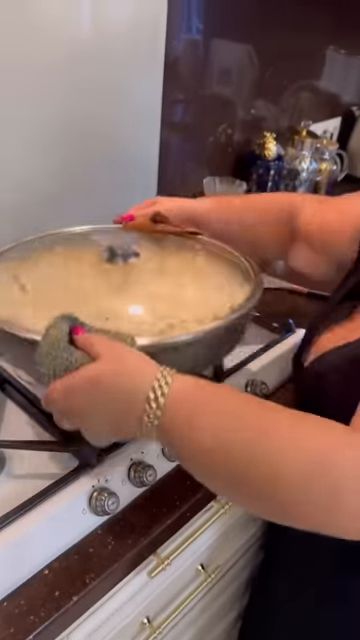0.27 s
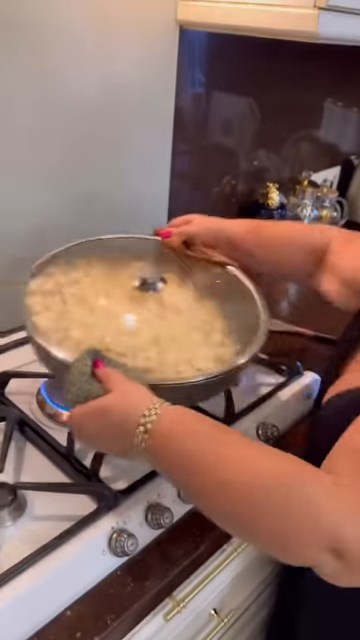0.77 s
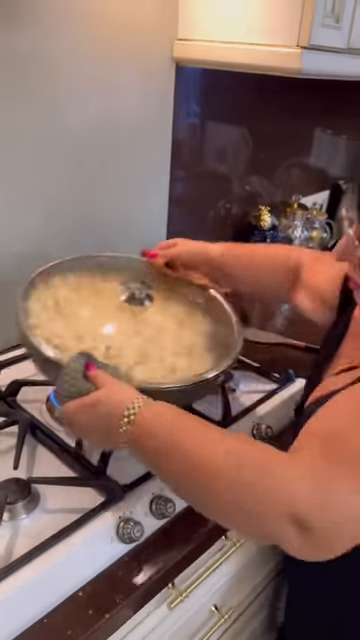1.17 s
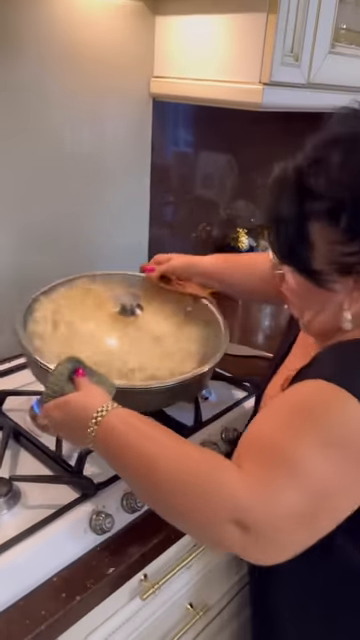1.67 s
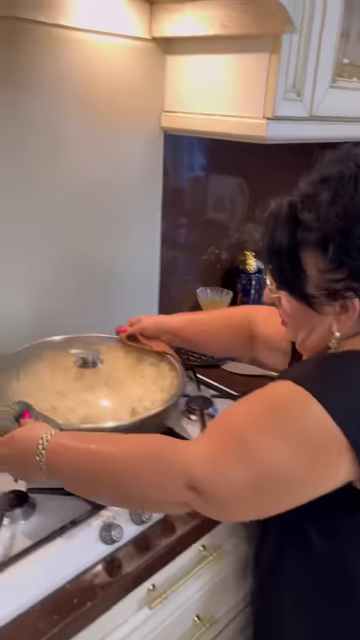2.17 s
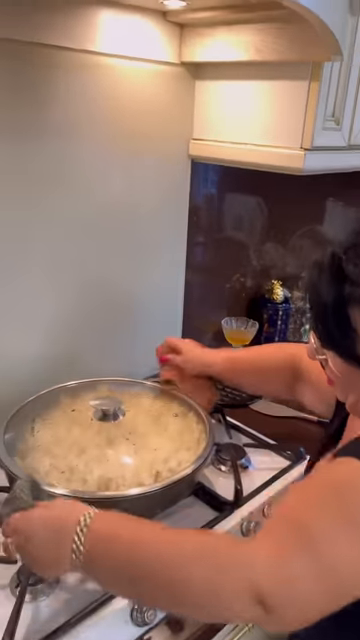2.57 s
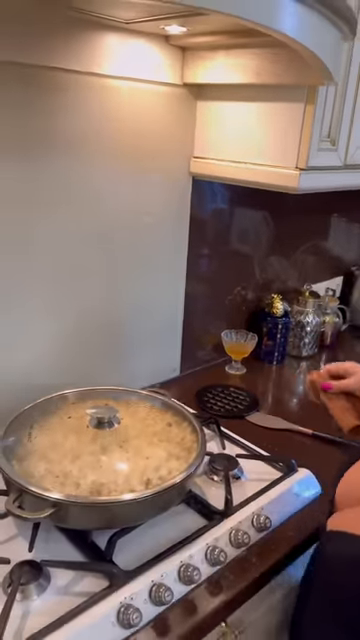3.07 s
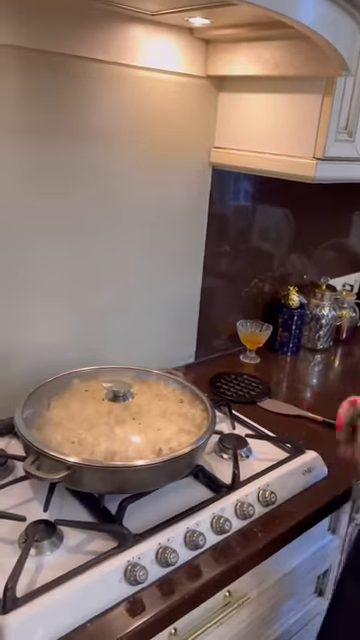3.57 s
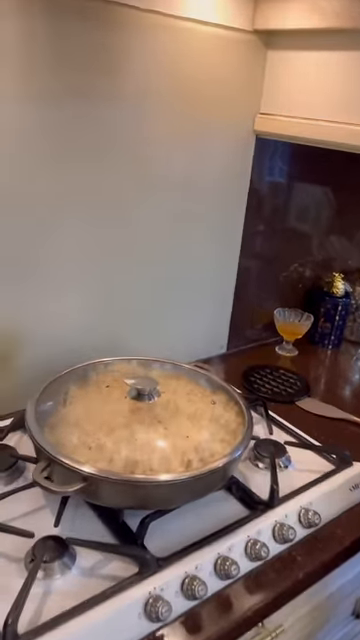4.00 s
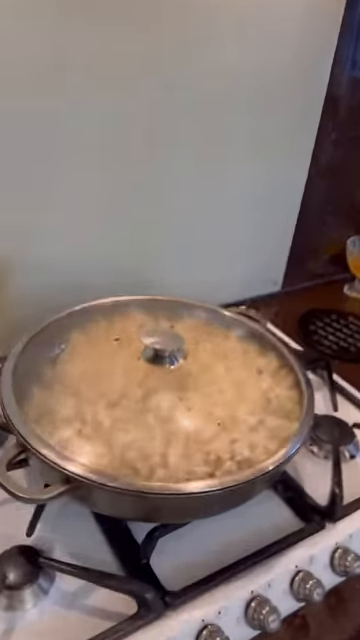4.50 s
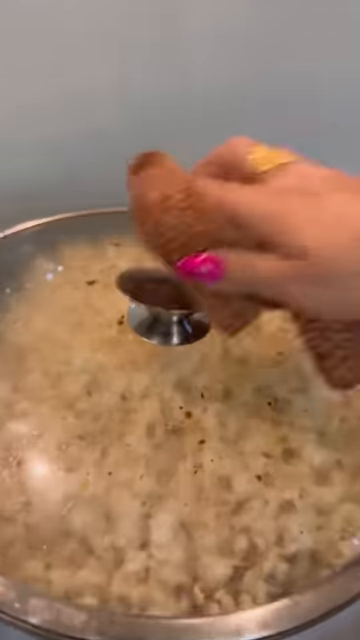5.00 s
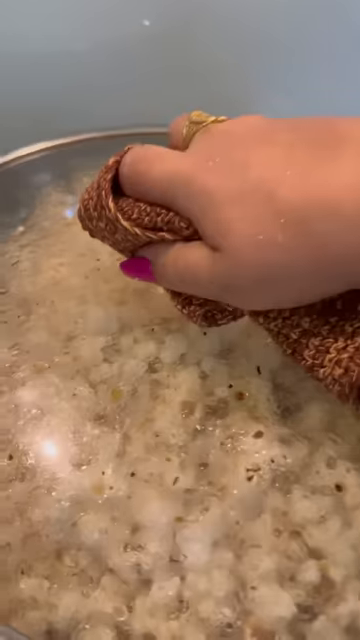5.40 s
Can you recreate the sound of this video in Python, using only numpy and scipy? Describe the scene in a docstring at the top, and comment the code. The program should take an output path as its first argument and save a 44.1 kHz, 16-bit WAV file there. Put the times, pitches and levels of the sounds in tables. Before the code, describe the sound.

In a small home kitchen, kernels snap and thump inside a lidded pan over a low gas flame. Popcorn swishes as the pan is swirled, then metal scrapes along the grate and lands with a bump and a loud ringing knock. Popping thickens, the glass lid clinks, and steam hisses up at the end with dull knocks. Close stereo microphone, short room echo.

```python
"""Popcorn pops in a wide pan with a glass lid on a gas hob: hull crack, low puff of steam, kernel tap.
The lid clinks and rings; pan and lid give short dull knocks; the popcorn swishes as the pan is swirled.
The pan rubs and hums on the grate, is dragged aside and set down with a bump and a loud knock.
Steam and hot oil hiss under the lid, made of random tiny clicks; the burner is low, even noise.
A stereo microphone hears it in a small kitchen, with the pops 11 dB above their echo."""
import sys
import numpy as np
from scipy import signal
from scipy.fft import rfft, irfft, next_fast_len
from scipy.io import wavfile

SR = 44100
rng = np.random.default_rng(int(sys.argv[2]) if len(sys.argv) > 2 else 0)


def generate_wav(sig):
    """Save sig (samples, or channels by samples) to the path in sys.argv[1] as 16-bit PCM at SR."""
    pcm = np.round(np.clip(np.atleast_2d(sig).T, -1, 1) * 32767).astype(np.int16)
    wavfile.write(sys.argv[1], SR, pcm)


N = 249045
TIME = np.arange(N) / SR   # s
PADDED = 2 * next_fast_len(N // 2 + SR // 4)   # room for tails when filtering
FREQS = np.maximum(np.arange(PADDED // 2 + 1) * SR / PADDED, 1)   # Hz

# Levels in event tables are relative; the function below each table adds its own gain.
# Colour tables give the shape of a spectrum, as power per Hz.

# the pops, muffled when deep in the heap: start_s [s], crack_db [dB], puff_db [dB]
POP_EVENTS = [(0.1184, -70, -38), (0.1433, -20, -39), (0.209, -30, -34), (0.305, -43, -43),
              (0.363, -46, -37), (0.527, -25.5, -43.5), (0.696, -60, -34.5), (0.753, -31, -35),
              (1.4113, -24.5, -37), (1.716, -28.5, -37.5), (1.86, -39, -42), (2.1742, -23.5, -43),
              (2.582, -31.5, -34), (2.7492, -23.5, -32.5), (2.933, -22.5, -51), (3.1622, -28, -35),
              (3.277, -32, -41), (3.309, -29.5, -46), (3.4712, -39.5, -39.5), (3.5716, -28.5, -41),
              (3.6015, -21.5, -37.5), (3.6492, -28, -43), (3.7339, -37.5, -36.5), (3.913, -26.5, -36.5),
              (3.989, -22, -38), (4.1864, -28, -39), (4.277, -31.5, -39), (4.596, -21, -29.5),
              (4.6485, -22.5, -29.5), (4.724, -20, -31.5), (4.801, -26, -33), (4.832, -40, -32.5),
              (4.8796, -36, -33), (5.1415, -19, -36), (5.1603, -23.5, -30), (5.3333, -16.5, -34),
              (5.4595, -21.5, -26.5), (5.5006, -26.5, -28.5)]
# colour of the hull crack: pitch_hz [Hz], level_db [dB per Hz]
CRACK_COLOUR = [(1000, -22), (3000, -10), (5500, -1), (8500, 0), (11000, -4), (15500, -5)]
# a popping kernel is thrown against the pan: usual throw [dB], dB gained per dB of crack and of puff
THROW_DB, THROW_PER_CRACK, THROW_PER_PUFF = -35, 0.48, 0.09
BOOM_PER_DB = 1.5   # a stronger puff shakes the pan more: dB of extra boom per dB
# the puffs get higher as the pan fills
PUFF_HZ, PUFF_RISE_HZ_PER_S = 116.8, 3.77


def popcorn(crack_gain_db=16, tap_gain_db=21, ring_gain_db=12, puff_gain_db=5, contact_delay_s=0.0006):
    """Steam puff, hull crack and kernel tap with lid ring; a stronger pop throws the kernel harder."""
    cracks, taps, body = np.zeros((2, N)), np.zeros((2, N)), np.zeros(N)
    _, usual_crack_db, usual_puff_db = np.mean(POP_EVENTS, axis=0)
    for start_s, crack_db, puff_db in POP_EVENTS:
        contact_s = start_s + contact_delay_s
        extra_puff_db = puff_db - usual_puff_db
        throw_db = THROW_DB + THROW_PER_CRACK * (crack_db - usual_crack_db)
        throw_db = throw_db + THROW_PER_PUFF * extra_puff_db
        puff_hz = PUFF_HZ + PUFF_RISE_HZ_PER_S * start_s
        steam_puff = puff(puff_hz, BOOM_PER_DB * extra_puff_db)
        add(cracks, contact_s, from_db(crack_db + crack_gain_db) * burst(t60=0.059, spike=0.67))
        add(taps, contact_s, from_db(tap_gain_db) * tap(throw_db))
        add(body, contact_s, from_db(throw_db + ring_gain_db) * lid_ring())
        add(body, start_s, from_db(puff_db + puff_gain_db) * steam_puff)
    sharp = colour(cracks, CRACK_COLOUR) + under_lid(colour(taps, TAP_COLOUR))
    return spread(sharp) + body


def burst(t60, spike):
    """A sharp snap, in the first channel, and its scatter inside the pan; energy 1."""
    t = TIME[:SR // 8]
    scatter = energy_one(rng.standard_normal((2, SR // 8)) * dying(t, t60))
    scatter[0, 0] += spike
    return energy_one(scatter)


PUFF_T60 = .13   # s, ring and boom after the thump


def puff(hz, shake_db=0, swell_cycles=0.9, glide=3.15, glide_s=0.0025,
         ring_db=-22, boom_hz=86, boom_db=-14.0):
    """A short thump sinks in pitch towards hz; a faint ring and a soft boom of the pan follow."""
    t = TIME[:SR // 6]
    age = t * hz / swell_cycles   # 1 at the fullest
    thump = (age * np.exp(1 - age)) ** 3
    pitch = hz * (1 + glide * np.exp(-t / glide_s))
    wave = np.sin(2 * np.pi * np.cumsum(pitch) / SR)
    boom = from_db(boom_db + shake_db) * np.sin(2 * np.pi * boom_hz * t)
    after = from_db(ring_db) * wave + boom
    return thump * wave + np.minimum(age, 1) * dying(t, PUFF_T60) * after


# colour of a kernel tap: pitch_hz [Hz], level_db [dB per Hz]
TAP_COLOUR = [(200, -5.5), (700, 7), (1100, 1), (1900, 5.5), (3000, 3.5), (7000, 0.5), (14000, -2)]


def tap(db, contact_hz=3000, usual_db=-35):
    """A kernel strikes pan or lid; a harder tap is a shorter contact, so it is brighter and sharper."""
    hardness = from_db(db - usual_db)
    dull = np.exp(-2 * np.pi * contact_hz * hardness / SR)   # one-pole lowpass
    strike = burst(t60=.042, spike=.25 + .22 * hardness)
    return from_db(db) * signal.lfilter([1 - dull], [1, -dull], strike)


# ring of the lid and the air under it, clusters of close modes: pitch_hz [Hz], level_db [dB], t60_s [s]
LID_MODES = [(800, -2.5, 0.08), (1320, 0, 0.1), (1570, -3, 0.11), (1770, -2, 0.06), (2230, 0, 0.05),
             (2720, 1.5, 0.06), (3500, -4, 0.08), (4230, -8, 0.09)]


def lid_ring(strongest_hz=None, focus_db=19):
    """The lid rings; where it is struck decides which cluster answers most."""
    modes = []
    for hz, db, t60 in LID_MODES:
        octaves_away = abs(np.log2(hz / (strongest_hz or hz)))
        modes.append((hz, db - focus_db * np.sqrt(octaves_away), t60))
    return ringing(modes, uneven_db=3, split_hz=28, count=4)


def under_lid(x, width_hz=130, lift=0.73):
    """Sound from inside the pan is lifted around each resonance of the lid."""
    peaks = 0
    for hz, db, _ in LID_MODES:
        peaks = peaks + from_db(db) * signal.lfilter(*signal.iirpeak(hz, hz / width_hz, fs=SR), x + 1e-18)
    return x + lift * peaks


def ringing(modes, uneven_db, split_hz=0, count=1):
    """Struck modes, each a cluster of close partials; every blow stirs them differently; energy 1."""
    t, out = TIME[:round(SR * max(m[2] for m in modes))], 0
    for hz, db, t60 in modes:
        for luck, sign, offset in rng.standard_normal((count, 3)):
            strength = np.sign(sign) * from_db(db + uneven_db * luck)
            partial = np.sin(2 * np.pi * (hz + split_hz * offset) * t)
            out = out + strength * partial * dying(t, t60)
    return energy_one(out)


def buried_pops(level_db=-45, tick_db=-26, middle_hz=125, count=60):
    """Kernels deep in the heap give only a soft thud and a faint tick, at uneven intervals."""
    thuds, ticks = np.zeros(N), np.zeros(N)
    times = (np.arange(count) + rng.random(count)) * N / SR / count
    for start_s, (size, pitch) in zip(times, rng.standard_normal((count, 2))):
        strength = from_db(4 * min(size, 1))
        add(thuds, start_s, from_db(level_db) * strength * puff(middle_hz * np.exp(.25 * pitch)))
        add(ticks, start_s, from_db(tick_db) * strength * burst(t60=.04, spike=.2)[0])
    return thuds + colour(ticks, TAP_COLOUR)


# the lid, struck by a kernel or chattering on the rim:
# start_s [s], tap_db [dB], ring_db [dB], strongest_hz [Hz]
LID_CLINKS = [(0.129, -35, -42.5, 1320), (3.915, -57, -47, 1570), (4.187, -48, -45.5, 1570),
              (4.191, -54, -48, 4230), (4.223, -46, -57, 1320), (4.406, -36, -50, 1770),
              (4.438, -39, -53, 2720), (4.515, -41, -52, 2720), (4.594, -41, -43, 1770),
              (4.614, -33, -43.5, 1320), (4.659, -31, -42, 1770), (4.6691, -19.5, -31, 2720),
              (4.671, -45, -36.5, 1320), (4.726, -43, -38.5, 800), (4.802, -33, -49, 1770),
              (4.922, -43.5, -49.5, 1320), (5.163, -36, -40, 800), (5.338, -24.5, -35.5, 800),
              (5.479, -39, -38.5, 1320), (5.505, -35, -37, 800), (5.525, -35.5, -39.5, 1320),
              (5.614, -36, -36.5, 1770)]


def clinks(tap_gain_db=23.0, ring_gain_db=27):
    """A hard tap on the glass and the short ring that follows it."""
    taps, rings = np.zeros((2, N)), np.zeros(N)
    for start_s, tap_db, ring_db, strongest_hz in LID_CLINKS:
        add(taps, start_s, from_db(tap_gain_db) * tap(tap_db))
        add(rings, start_s, from_db(ring_db + ring_gain_db) * lid_ring(strongest_hz))
    return spread(under_lid(colour(taps, TAP_COLOUR))) + rings


# dull knocks: start_s [s], level_db [dB], pitch_hz [Hz]
DULL_KNOCKS = [(5.159, -29, 427), (5.5248, -20, 276), (5.585, -26.5, 327), (5.62, -33, 262)]


def dull_knocks():
    """Short dull knocks of pan and lid: a full thud under one pop, then the lid on its rim."""
    out = np.zeros(N)
    for start_s, level_db, pitch_hz in DULL_KNOCKS:
        add(out, start_s, from_db(level_db) * puff(pitch_hz, swell_cycles=1.35, glide=0.32))
    return out


# the pan bumps on the grate, lands and settles: start_s [s], clatter_db [dB], ring_db [dB], rattle_s [s],
# low_hz [Hz], full_hz [Hz], fullness [gain of the resonance at full_hz], high_hz [Hz]
PAN_KNOCKS = [(1.986, -25, -29.5, 0.079, 213, 270, 1.5, 4330),
              (2.216, -21.5, -18, 0.057, 55, 680, 0.93, 9400),
              (2.285, -28.5, -24.5, 0.058, 50, 80, 1.5, 194)]
# ring of grate and hob sheet: pitch_hz [Hz], level_db [dB], t60_s [s]
HOB_MODES = [(76, 1, 0.51), (137.3, 7, 0.45), (239, 4.5, 0.53), (365.5, -3.5, 0.5), (516, 0.5, 0.72),
             (589, 8.5, 0.48), (647, 1, 0.57), (724, 4, 0.5), (860, 4, 0.15), (995, 2.5, 0.3)]
# colour of the dense clatter: pitch_hz [Hz], level_db [dB per Hz]
CLATTER_COLOUR = [(40, 0), (100, -5.5), (270, 0), (500, -6.5), (800, -7), (1400, -10.5), (3000, -14),
                  (5000, -20), (7000, -14.5), (15000, -21)]
# how long the clatter lasts: pitch_hz [Hz], t60_s [s]
CLATTER_DECAY = [(100, 0.62), (500, 0.71), (950, 0.53), (2000, 0.49), (9000, 0.37)]


def knocks(clatter_gain_db=32, ring_gain_db=33, contacts_per_s=2500, rise_s=0.0068, tail_db=2.0):
    """The heavy pan chatters on the grate as it lands; the hob sheet rings and a dense clatter dies away."""
    clatter, rings = np.zeros((2, N)), np.zeros(N)
    for start_s, clatter_db, ring_db, rattle_s, low_hz, full_hz, fullness, high_hz in PAN_KNOCKS:
        tail = diffuse_tail(CLATTER_DECAY)
        contacts = (rng.random(N) < contacts_per_s / SR) * rng.standard_normal(N)
        chatter = energy_one(contacts * np.exp(-(TIME / rattle_s) ** 2))
        blow = (chatter + from_db(tail_db) * tail) * (1 - np.exp(-TIME / rise_s))
        # where the pan lands decides which broad resonance of the grate answers most
        blow = blow + fullness * signal.lfilter(*signal.iirpeak(full_hz, 2, fs=SR), blow + 1e-18)
        softness = signal.butter(2, [low_hz, min(high_hz, .45 * SR)], "band", fs=SR, output="sos")
        add(clatter, start_s, from_db(clatter_db + clatter_gain_db) * signal.sosfilt(softness, blow))
        ring = signal.sosfilt(softness, ringing(HOB_MODES, uneven_db=2.0, split_hz=4.04, count=2))
        add(rings, start_s + rise_s, from_db(ring_db + ring_gain_db) * ring)
    return colour(clatter, CLATTER_COLOUR) + rings


# the pan is dragged over the grate: a first bite dies away into a lighter glide
DRAG_START_S, DRAG_FADE_S = 1.46, 0.059
DRAG_BITE_DB, DRAG_BITE_T60, DRAG_GLIDE_DB = -31.5, 0.94, -47.5
# colour of the rubbing: pitch_hz [Hz], level_db [dB per Hz]
RUB_COLOUR = [(80, -14), (170, -8.5), (260, 1), (340, -5.5), (480, -12.5), (800, -18.5), (4000, -26.5)]


def slide():
    """The pan bottom bites on the iron grate, then rubs more lightly until it has been set down."""
    since = np.maximum(TIME - DRAG_START_S, 0)
    end_s = PAN_KNOCKS[-1][0] + DRAG_FADE_S
    pressure = from_db(DRAG_GLIDE_DB) + from_db(DRAG_BITE_DB) * dying(since, DRAG_BITE_T60)
    contact = np.clip(np.minimum(since, end_s - TIME) / DRAG_FADE_S, 0, 1)
    return pressure * contact * spread(colour(grains(per_s=1100, uneven_db=-1.0), RUB_COLOUR))


def grains(per_s, uneven_db):
    """Two trains of random tiny clicks of uneven size; rms 1."""
    sizes = from_db(uneven_db * np.minimum(rng.exponential(1, (2, N)), 4))
    sizes = sizes * rng.choice([-1, 1], (2, N))
    return rms_one(sizes * (rng.random((2, N)) < per_s / SR))


# rubbing makes the pan hum: strongest_s [s], level_db [dB]
PAN_HUMS = [(1.1, -47), (5.62, -45.5)]
HUM_HZ, HUM_WIDTH_HZ, HUM_T60 = 374, 13, 0.42   # T60 in s, swell and ebb alike


def pan_hum():
    """Rubbing on the grate or the rim sets the pan humming for a moment: noise through a narrow peak."""
    rubbing = sum(from_db(db) * dying(np.abs(TIME - s), HUM_T60) for s, db in PAN_HUMS)
    resonance = signal.iirpeak(HUM_HZ, HUM_HZ / HUM_WIDTH_HZ, fs=SR)
    return rubbing * rms_one(signal.lfilter(*resonance, rng.standard_normal(N)))


# swirls of the pan: fastest_s [s], level_db [dB], t60_s [s, of swell and ebb]
PAN_SWIRLS = [(.32, -40.5, 1.7), (0.747, -32.5, 0.83), (1.16, -37.5, 0.99), (1.6, -38, 0.73)]
# colour of the swishing popcorn: pitch_hz [Hz], level_db [dB per Hz]
SWISH_COLOUR = [(500, -8), (2000, -4.5), (4200, -3), (6500, 0), (11000, -7), (15500, -8)]


def swish(flicker_db=0.3):
    """Light, dry popcorn tumbles along the wall of the pan, swelling and ebbing with each swirl."""
    speed = sum(from_db(db) * dying(np.abs(TIME - s), t60) for s, db, t60 in PAN_SWIRLS)
    brushing = colour(grains(per_s=2400, uneven_db=2.8), SWISH_COLOUR)
    return speed * from_db(flicker_db * drift(28.7)) * spread(under_lid(brushing, lift=0.45))


# vigour of the frying, as steam hiss: time_s [s], level_db [dB]
FRYING_VIGOUR = [(0.0, -48), (0.91, -41), (1.67, -38.5), (2.45, -53.5), (2.88, -49.5), (3.7, -56),
                 (4.51, -53.5), (5.43, -50), (5.65, -34.5)]
OIL_FOLLOWS = 0.57   # share of the steam's swing in dB that the oil follows
# colour of the steam: pitch_hz [Hz], level_db [dB per Hz]
STEAM_COLOUR = [(1500, -22), (4000, -8), (5400, 0), (8500, -.5), (10500, -4.5), (12000, -2.5), (15500, -2)]
# colour of the oil: pitch_hz [Hz], level_db [dB per Hz]
OIL_COLOUR = [(150, -9), (370, 10.5), (800, 9), (2100, 4.5), (3200, 3), (9000, -28.5)]


def frying(steam_gain_db=4.5, oil_db=-52, flicker_db=2.5, cavity_t60=0.22, cavity_db=-7):
    """Steam hisses at the rim, tiny droplets burst in the oil; the space under the lid rings with both."""
    hiss_db, = in_time(FRYING_VIGOUR)
    sizzle_db = OIL_FOLLOWS * (hiss_db - hiss_db.mean())
    steam_level = from_db(hiss_db + steam_gain_db + flicker_db * drift(25.177))
    steam = steam_level * colour(grains(per_s=25000, uneven_db=4.5), STEAM_COLOUR)
    oil_level = from_db(sizzle_db + oil_db + flicker_db * drift(26.34))
    oil = oil_level * colour(grains(per_s=9000, uneven_db=3.5), OIL_COLOUR)
    cavity = rfft(burst(cavity_t60, spike=0)[0], PADDED)
    return spread(filtered(steam + oil, 1 + from_db(cavity_db) * cavity))


# colour of the burner: pitch_hz [Hz], level_db [dB per Hz]
FLAME_COLOUR = [(50, -12), (135, 3.5), (200, -5), (1200, -28)]


def flame(level_db=-51.5):
    """The low, even rush of the burner: steady coloured noise."""
    return from_db(level_db) * spread(colour(rng.standard_normal((2, N)), FLAME_COLOUR))


# decay of the small kitchen: pitch_hz [Hz], t60_s [s]
KITCHEN_DECAY = [(1000, 0.24), (12000, 0.025)]


def kitchen_echo(sound):
    """The room answers the left channel with a diffuse tail that dies at its own speed in each octave."""
    return filtered(sound[0], rfft(diffuse_tail(KITCHEN_DECAY), PADDED))


def diffuse_tail(t60s):
    """Stereo noise in which each octave or so dies at its own speed."""
    out, edges = 0, np.geomspace(35, 17000, 10)
    settle = SR // 4   # drop the start-up of the filters
    for low, high in zip(edges, edges[1:]):
        octave = signal.butter(2, [low, high], "band", fs=SR, output="sos")
        band = signal.sosfilt(octave, rng.standard_normal((2, SR)))[:, settle:]
        out = out + band * dying(TIME[:SR - settle], at_hz(t60s, np.sqrt(low * high)))
    return spread(energy_one(out))


# how alike left and right hear a diffuse sound: pitch_hz [Hz], likeness [0 to 1]
STEREO_LIKENESS = [(100, .995), (300, .95), (640, .78), (1400, .9), (3100, .6), (7000, .65), (12000, .92)]


def spread(pair):
    """Two unrelated signals become a diffuse field, as alike at each pitch as the table says."""
    alike = np.clip(at_hz(STEREO_LIKENESS, FREQS), 0, 1)
    mid, side = filtered(pair, np.sqrt([(1 + alike) / 2, (1 - alike) / 2]))
    return np.array([mid + side, mid - side])


def from_db(db):
    """Decibels to gain."""
    return 10 ** (np.asarray(db) / 20)


def rms_one(x):
    """Scale to rms 1."""
    return x / np.sqrt(np.mean(x ** 2) + 1e-20)


def energy_one(x):
    """Scale to a mean energy of 1 per channel."""
    return rms_one(x) / np.sqrt(x.shape[-1])


def in_time(rows):
    """The columns of a curve at every sample."""
    s, *columns = np.transpose(rows)
    return [np.interp(TIME, s, c) for c in columns]


def at_hz(points, hz):
    """Read a table on a log-frequency axis."""
    table_hz, values = np.array(points).T
    return np.interp(np.log(hz), np.log(table_hz), values)


def dying(t, t60):
    """Envelope that loses 60 dB in t60 seconds."""
    return np.exp(-np.log(1000) * t / t60)


def add(track, s, sound):
    """Lay a sound into a track at a time in seconds."""
    start = max(round(s * SR), 0)
    room = max(N - start, 0)
    track[..., start:start + sound.shape[-1]] += sound[..., :room]


def drift(knots_per_s):
    """Slow chance: straight lines between random knots of spread 1."""
    knots = rng.standard_normal(512)
    return np.interp(TIME * knots_per_s, np.arange(len(knots)), knots)


def filtered(x, response):
    """Apply a frequency response."""
    return irfft(rfft(x, PADDED) * response, PADDED)[..., :N]


def colour(x, spectrum):
    """Causal (minimum-phase) filter that keeps the power of white noise."""
    cepstrum = irfft(np.log(rms_one(from_db(at_hz(spectrum, FREQS)))))
    # double the positive half, drop the negative half
    fold = 1 + np.sign(PADDED // 2 - np.arange(PADDED)) - (np.arange(PADDED) == 0)
    return filtered(x, np.exp(rfft(cepstrum * fold)))


def scene(room_db=-11):
    """Pops, clinks and dull knocks echo in the kitchen over the moving pan and the steady sounds."""
    pops = popcorn() + clinks() + dull_knocks()
    pan = knocks() + slide() + pan_hum() + swish()
    return pops + from_db(room_db) * kitchen_echo(pops) + buried_pops() + pan + frying() + flame()


# phase lead of the left channel, which widens the stereo treble: pitch_hz [Hz], left_lead_rad [radians]
LEFT_LEAD = [(150, 0), (4200, .2), (4900, -3), (5500, -6.3), (7000, -6.7), (8500, -7.7), (11000, -9.3),
             (13500, -9.5), (15500, -10.2)]
# level between the channels: pitch_hz [Hz], left_minus_right_db [dB]
STEREO_BALANCE = [(100, 0), (300, 0.9), (650, 4.5), (1300, 0.3), (4000, .5)]
CUTOFF_HZ = 15750


def record(dry):
    """Left and right differ in level and phase; the deepest bass and the top are cut."""
    lean = from_db(at_hz(STEREO_BALANCE, FREQS) / 2)   # half to each side
    left = lean * np.exp(1j * at_hz(LEFT_LEAD, FREQS))
    stereo = filtered(dry, np.array([left, 1 / lean]))
    stereo = signal.sosfilt(signal.butter(4, 35, "high", fs=SR, output="sos"), stereo)
    return signal.sosfilt(signal.ellip(10, .1, 80, CUTOFF_HZ, fs=SR, output="sos"), stereo)


dry = scene()
out = record(dry)
generate_wav(out)
```